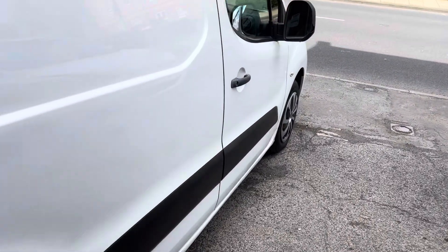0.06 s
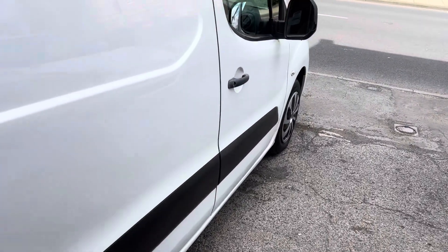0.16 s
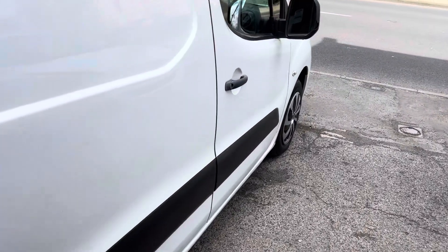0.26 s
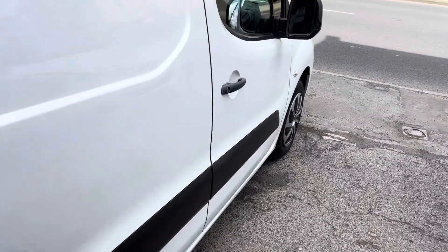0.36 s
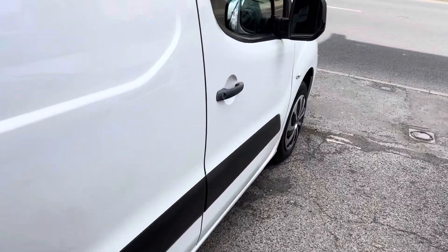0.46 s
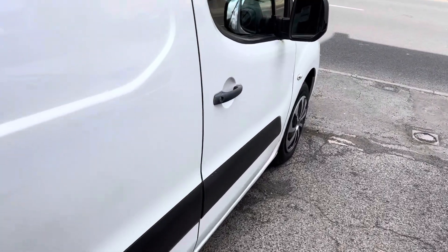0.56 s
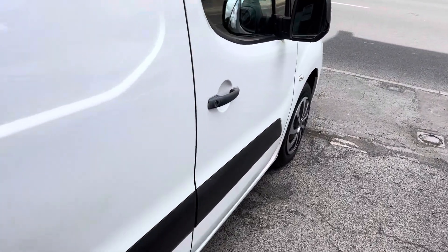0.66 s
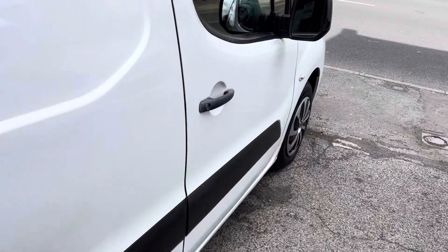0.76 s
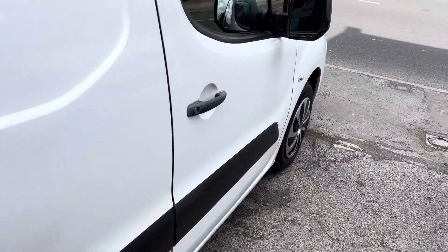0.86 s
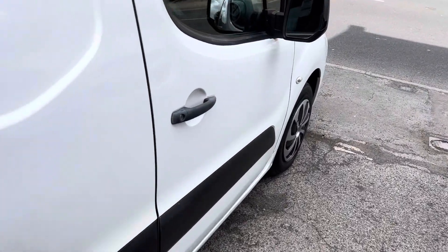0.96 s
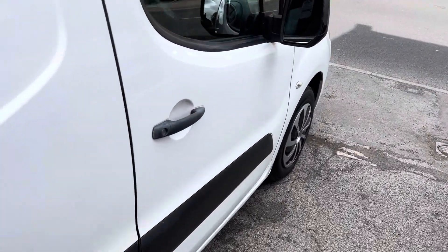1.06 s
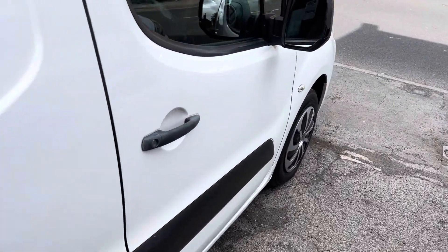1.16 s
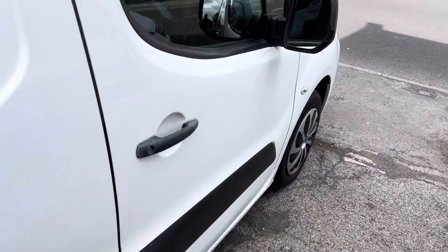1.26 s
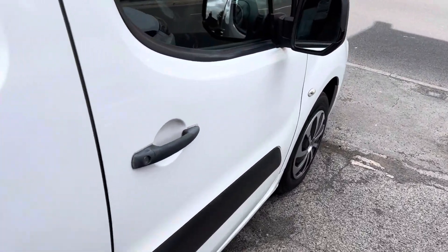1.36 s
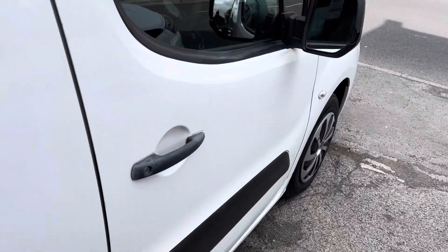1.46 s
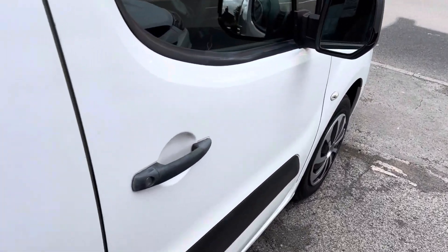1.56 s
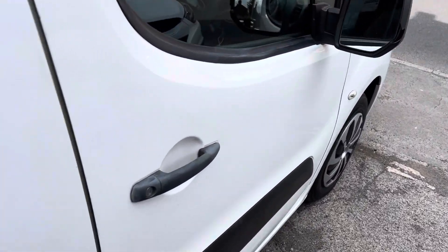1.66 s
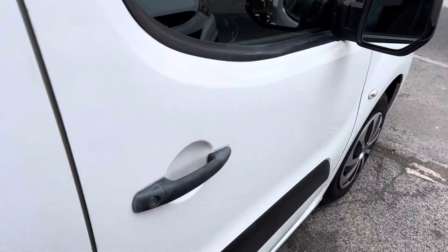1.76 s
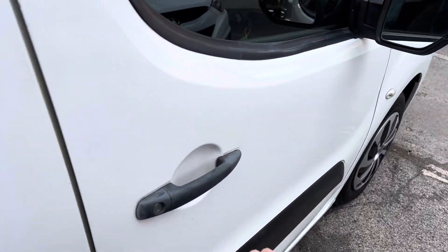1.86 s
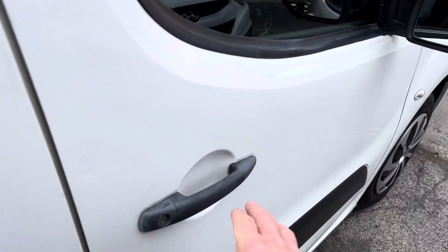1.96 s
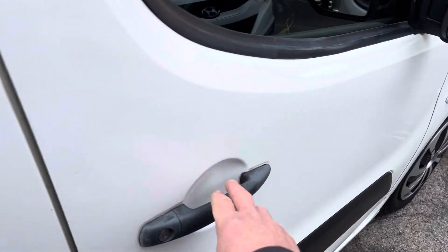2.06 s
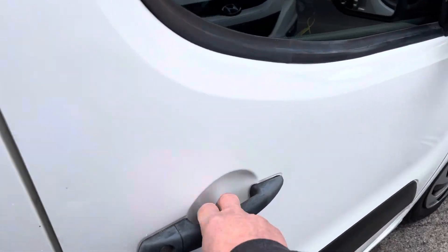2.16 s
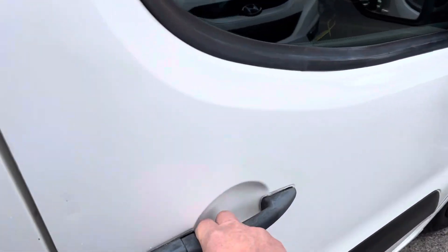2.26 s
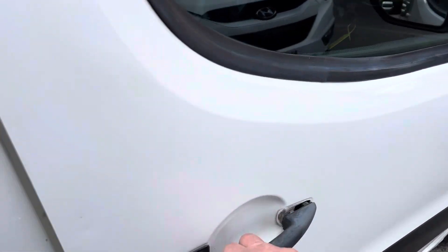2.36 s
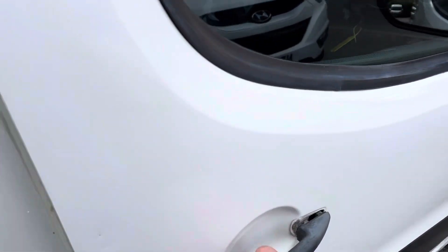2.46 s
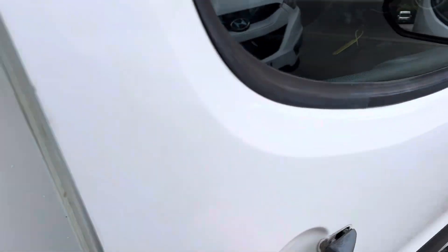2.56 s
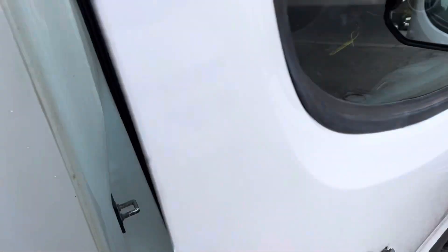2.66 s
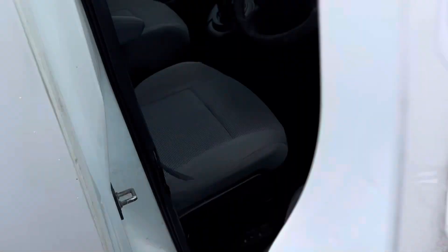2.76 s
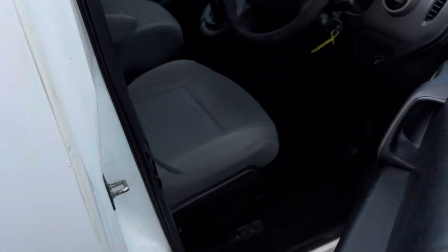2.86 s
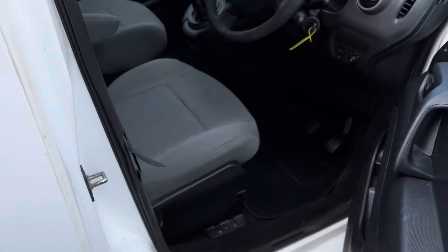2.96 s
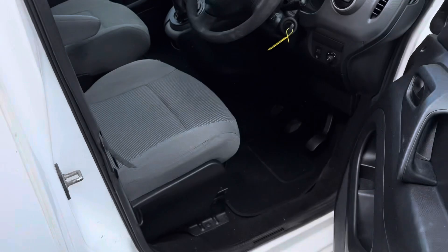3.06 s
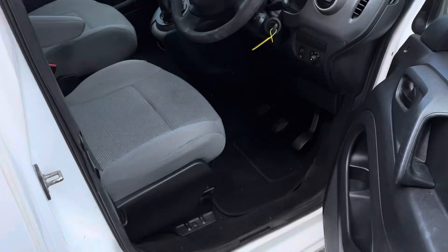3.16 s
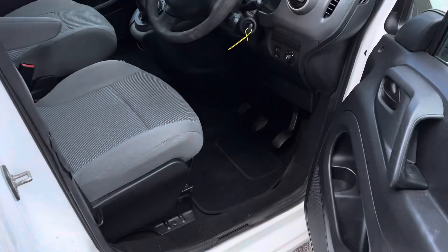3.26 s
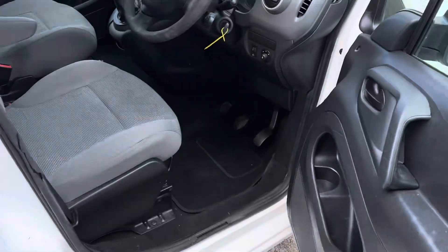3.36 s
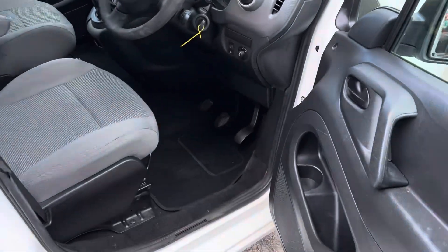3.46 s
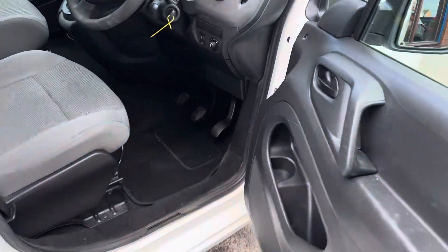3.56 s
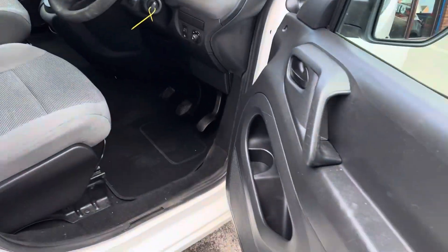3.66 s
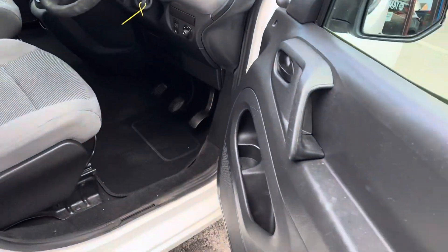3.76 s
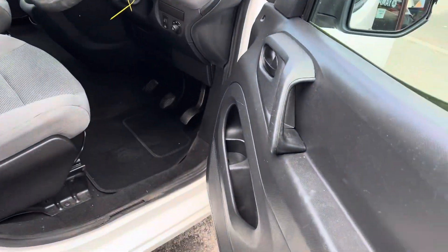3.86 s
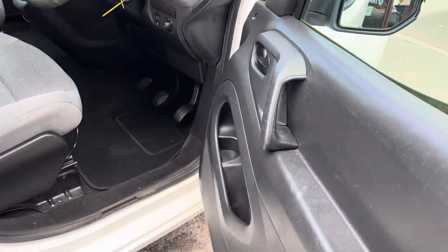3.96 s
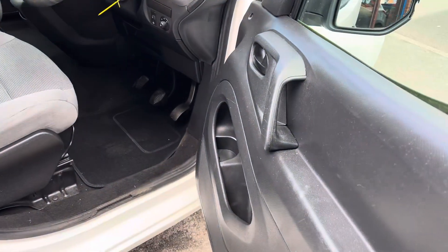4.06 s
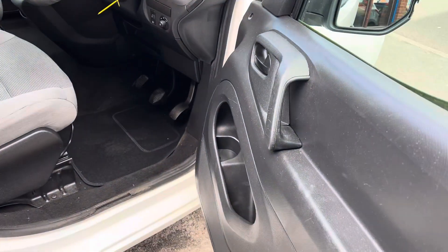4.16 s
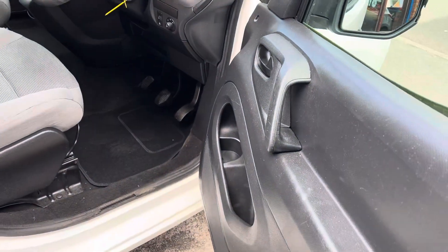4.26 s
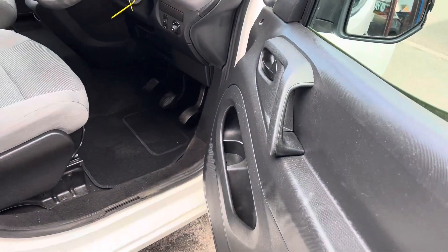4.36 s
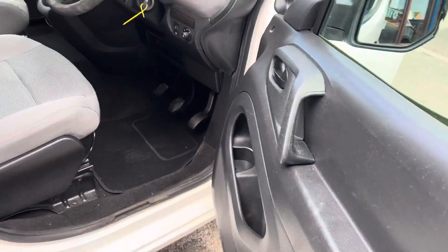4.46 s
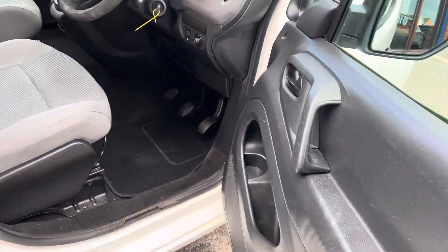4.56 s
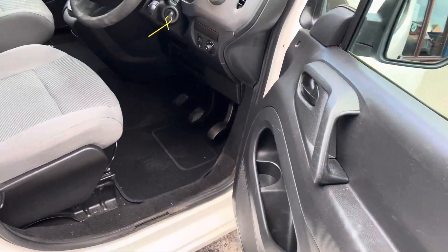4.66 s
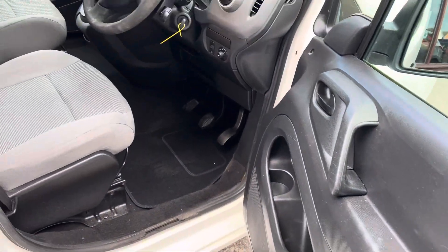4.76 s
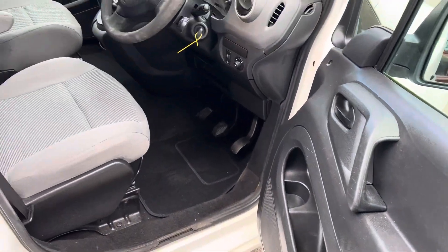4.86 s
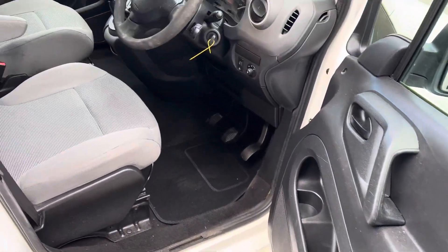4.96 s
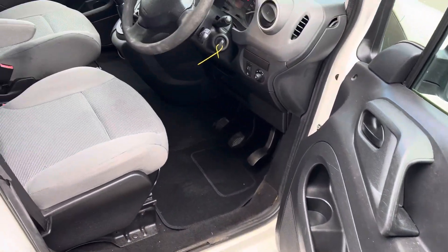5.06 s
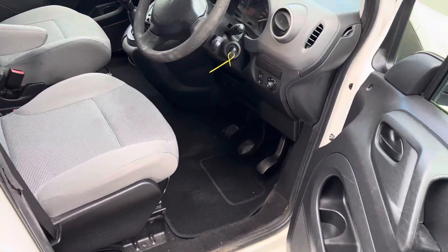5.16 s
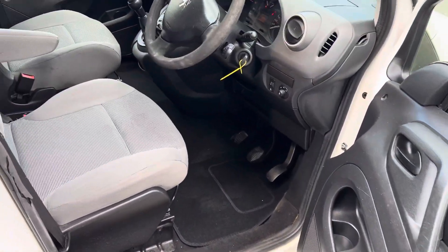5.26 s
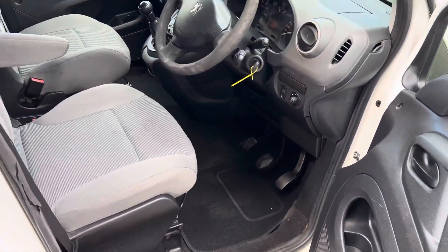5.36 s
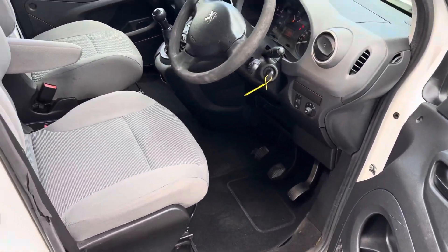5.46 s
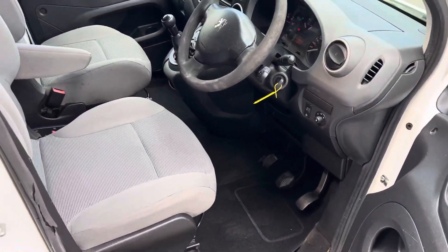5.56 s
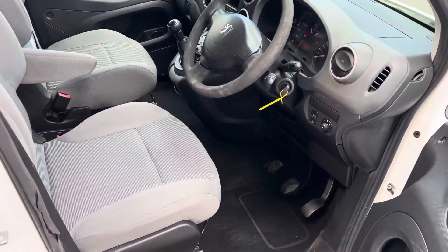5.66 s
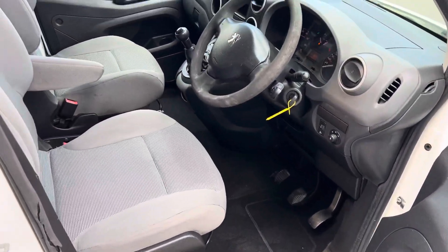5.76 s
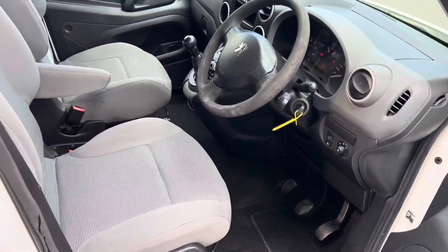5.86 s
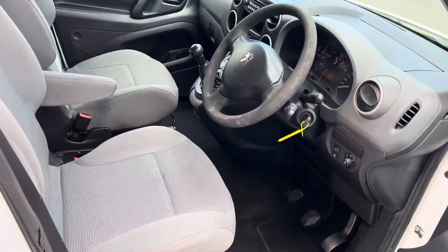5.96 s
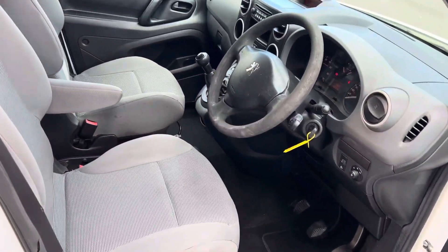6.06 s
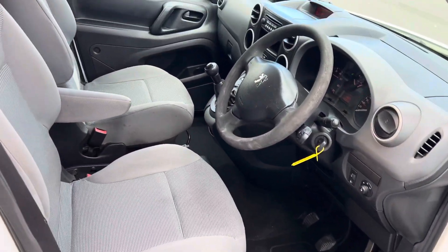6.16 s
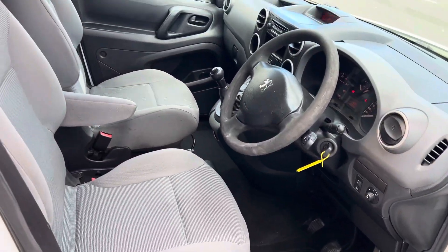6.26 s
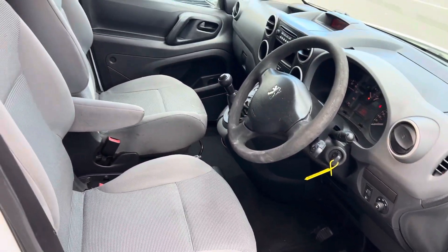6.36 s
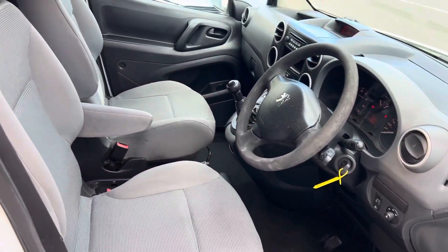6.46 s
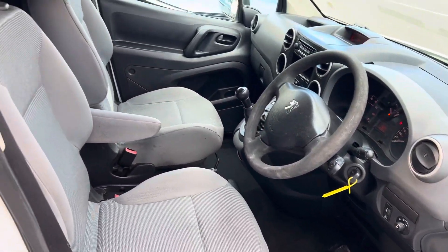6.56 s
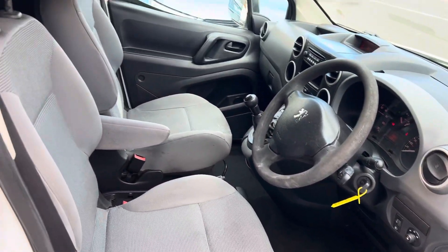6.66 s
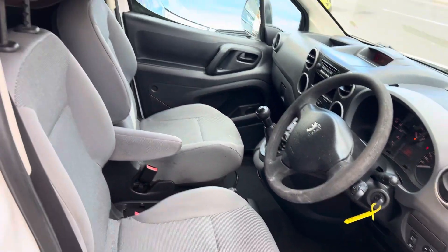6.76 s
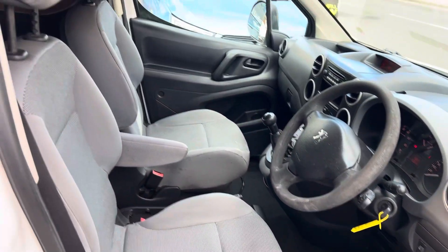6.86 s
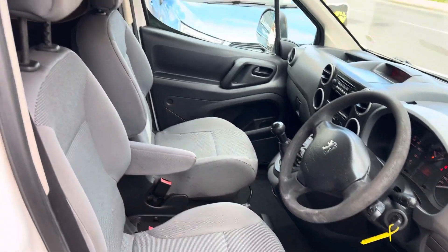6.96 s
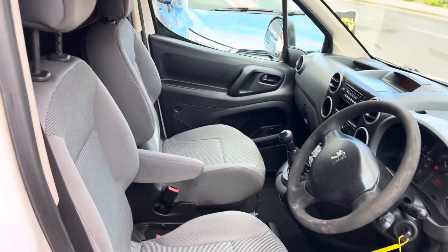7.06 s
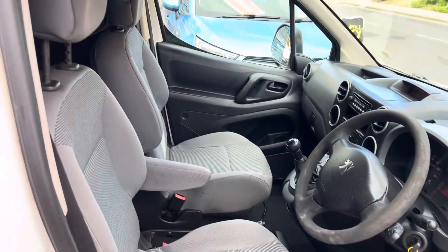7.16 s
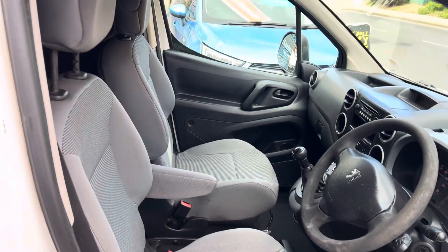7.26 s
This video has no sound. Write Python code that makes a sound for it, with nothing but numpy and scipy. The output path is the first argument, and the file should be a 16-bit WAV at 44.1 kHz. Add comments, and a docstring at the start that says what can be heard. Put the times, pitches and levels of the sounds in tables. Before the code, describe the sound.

A van idles on an outdoor lot with a low, throbbing rumble, a light engine rattle and faint hiss. Soft steps and small handling ticks come close to the hand-held microphone. The door handle clicks, the latch clacks, and the driver's door opens with a thump and a quick run of juddering knocks. A few soft bumps and rustles follow, and the engine's boom swells as the microphone leans into the cab.

```python
"""An outdoor lot, beside an idling van, on the stereo microphone of a hand-held camera walking up to it.
Four cylinders puff out an exhaust boom and rattle the block, over rumble, hiss and a narrow hum.
Close by, steps knock, cloth scrapes and the camera's grip ticks. At arm's length the handle and latch
clack and the driver's door thumps and judders over its check strap. The open door screens the engine
until the microphone passes it, and the boom swells as the camera leans into the cab."""
import sys
import numpy as np
from scipy import signal
from scipy.fft import rfft, irfft, next_fast_len
from scipy.io import wavfile
from scipy.ndimage import uniform_filter1d

SR = 44100
rng = np.random.default_rng(int(sys.argv[2]) if len(sys.argv) > 2 else 0)


def wrap_up_sound(samples):
    """Save the sound to the file named by the first command line argument, as 16-bit audio."""
    columns = np.atleast_2d(samples).T
    # keep every value between -1 and 1, then stretch to whole-number steps
    tamed = np.clip(columns, -1, 1)
    steps = np.round(tamed * 32767).astype(np.int16)
    wavfile.write(sys.argv[1], SR, steps)


N = 322371

# strength of the four firings in turn: (level [dB])
CYLINDERS_DB = [-0.45, 0.95, 0.3, -0.65]
# the engine along the microphone's path: (time [s], boom level [dB], rumble level [dB])
ENGINE_LEVELS = [(0, -34, -36), (.5, -44, -46), (1.1, -45, -39), (1.7, -40.5, -38.5), (2.1, -48.5, -42.5),
                 (2.85, -41, -41.5), (3.35, -42.5, -47.5), (3.9, -44.5, -42.5), (4.27, -40.5, -40.5),
                 (4.65, -71, -47), (4.95, -37, -49), (5.3, -46, -45.5), (5.8, -37, -43), (6.35, -29, -42),
                 (6.7, -33, -40), (7.31, -31.5, -37.5)]
# phase between the two microphone ports: (frequency [Hz], lead of the left [rad])
PORT_LEAD = [(0, 0), (1890, -0.3), (3190, 1.3), (4220, 0.4), (7490, 0.5), (8700, -0.0), (9730, -3.0),
             (10900, -3.6), (11500, -6.3), (12800, -6.3), (13300, -9.4), (14400, -9.5), (14900, -12.6),
             (16500, -12.6)]


def gain_of(db):
    """Decibels to a factor."""
    return 10 ** (np.asarray(db) / 20)


def unit_rms(x):
    """Scales to rms 1."""
    return x / np.sqrt(np.mean(x ** 2) + 1e-20)


def curve_at(points, hz):
    """Reads a spectrum table on a log-frequency axis."""
    f, value = np.transpose(points)
    return np.interp(np.log(hz + 1), np.log(f + 1), value)


def add(mix, s, sound, pan_db):
    """Mixes a sound in at time s, pan_db louder on the left than on the right."""
    part = mix[:, round(s * SR):][:, :len(sound)]
    part += sound[:part.shape[1]] * gain_of([[pan_db / 2], [-pan_db / 2]])


def ring(modes, t):
    """Sum of dying modes, peak 1."""
    x = sum(gain_of(db - 60 * t / t60) * np.sin(2 * np.pi * hz * t) for hz, db, t60 in modes)
    return x / abs(x).max()


def band(x, low_hz, high_hz):
    """Gentle band-pass."""
    sos = signal.butter(2, [low_hz, min(high_hz, SR / 2.2)], "band", fs=SR, output="sos")
    return signal.sosfilt(sos, x)


def resonate(x, hz, width_hz):
    """Two-pole resonance with gain near 1 at its centre."""
    return signal.lfilter(*signal.iirpeak(hz, hz / width_hz, SR), x)


def mic_position(t):
    """How far the door screens the microphone from the engine and how far it leans into the cab, 0-1."""
    swing_s, pass_s, lean_s = (2.4, 3.0), (4.6, 5.8), (5.0, 6.5)
    swung, passed, in_cab = (np.interp(t, span, [0, 1]) for span in (swing_s, pass_s, lean_s))
    return swung - passed, in_cab


def firing_count(firing_hz=26.4):
    """Running count of firings of four cylinders at a slightly uneven idle."""
    wobble = 0.01127 * unit_rms(uniform_filter1d(rng.standard_normal(N), 3000))
    return np.cumsum(firing_hz * (1 + wobble)) / SR


def throb(firings, depth, spread_db):
    """Level that jumps at each firing and dies away before the next."""
    strength = gain_of(np.resize(CYLINDERS_DB, 256) + spread_db * rng.standard_normal(256))
    return unit_rms(1 + depth * strength[firings.astype(int)] * np.exp(-(firings % 1) / 0.14))


def exhaust_boom(firings):
    """Eight multiples of the firing rate line up into puffs, each of a different strength."""
    t = np.arange(N) / SR
    times, boom_db, _ = np.transpose(ENGINE_LEVELS)
    screened, in_cab = mic_position(t)
    second_db = np.interp(t, times, boom_db)
    third_db = second_db - 15.5 + 10.5 * screened + 8 * in_cab
    harmonics_db = [second_db - 12, second_db] + [third_db + db for db in (0, -7, -16, -14, -19, -15)]
    firings_db = np.resize(CYLINDERS_DB, 256) + 1.6 * rng.standard_normal((256, len(harmonics_db))).T
    lag_rad, port_rad = -3.0, 0.23  # the lag keeps the puffs pointed after the bass roll-off
    phase = lag_rad + port_rad * np.c_[[1, -1]]
    puffs = 0
    for k, (db, each_db) in enumerate(zip(harmonics_db, firings_db), 1):
        level = gain_of(db + np.interp(firings, np.arange(256), each_db))
        puffs += level * np.cos(2 * np.pi * k * firings + phase)
    return np.sqrt(2) * puffs * gain_of([[.3], [-.3]])


def engine_spectrum(hz, t):
    """Strength of the engine's noise by frequency and time, on the way from the van's flank to its cab."""
    # tone beside the body and at the open door: (frequency [Hz], relative density [dB])
    flank = [(30, 2), (60, 6), (130, -16), (350, -13.5), (650, -15), (1300, -13.5), (2200, -20.5),
             (3300, -17.5), (4700, -21.5), (6300, -18), (7050, -23), (7800, -19), (10000, -22),
             (12000, -27), (16000, -39.5)]
    cab = [(30, -30), (70, -14), (110, -6), (220, -10), (340, -18), (500, -16), (900, -25), (1900, -29),
           (2350, -35), (5000, -39), (6500, -32), (8500, -36), (11000, -45), (16000, -58)]
    times, _, path_db = np.transpose(ENGINE_LEVELS)
    screened, in_cab = mic_position(t)
    rumble_db = np.interp(t, times, path_db)
    middle_db = -26 + 0.47 * rumble_db - 1.5 * screened + 1.5 * in_cab
    hiss_db = -41.5 - 0.5573 * t  # sinks as the microphone closes in on the van
    cab_share = np.interp(in_cab, [0, 1], [0.27, 0.83])
    colour = gain_of(np.outer(curve_at(flank, hz), 1 - cab_share) + np.outer(curve_at(cab, hz), cab_share))
    for low, high, db in ((0, 300, rumble_db), (300, 1200, middle_db), (1200, SR, hiss_db)):
        inside = (hz >= low) & (hz < high)
        colour[inside] *= gain_of(db) / np.sqrt((colour[inside & (hz > 70)] ** 2).sum(0))
    return colour


def engine_wash(firings):
    """Patchy rumble and hiss that throb a little with each firing."""
    # likeness of the two ports: (frequency [Hz], correlation [0-1])
    port_likeness = [(60, .7), (200, .6), (400, .7), (1100, .45), (1800, .5), (3000, .8), (6000, .82),
                     (8500, .92), (16000, .9)]
    # balance of the two ports: (frequency [Hz], left minus right [dB])
    port_balance = [(60, .5), (300, .2), (1000, 1), (3000, 2), (5500, 2), (8000, 0), (16000, 0)]
    frames, hz = N // 256 + 5, np.fft.rfftfreq(1024, 1 / SR)
    left_re, left_im, apart_re, apart_im, patches = rng.standard_normal((frames, 513, 5)).T
    patches_db = 2.03 * unit_rms(uniform_filter1d(uniform_filter1d(patches, 8, 0), 6, 1))
    colour = engine_spectrum(hz, np.arange(frames) * 256 / SR)
    hz = hz[:, None]
    likeness, tilt = curve_at(port_likeness, hz), gain_of(curve_at(port_balance, hz) / 2)
    left = left_re + 1j * left_im
    right = likeness * left + np.sqrt(1 - likeness ** 2) * (apart_re + 1j * apart_im)
    right *= np.exp(-1j * curve_at(PORT_LEAD, hz))
    spectra = np.array([left * tilt, right / tilt]) * colour * gain_of(patches_db)
    low, high = (signal.istft(spectra * part, nperseg=1024, noverlap=768)[1][:, :N]
                 for part in (hz <= 900, hz > 900))
    low *= throb(firings, depth=0.35, spread_db=.4)
    high *= throb(firings, depth=0.26, spread_db=6.0)
    return gain_of(2.0) * (low + high)


def block_clatter(firings):
    """Combustion rattle rings in the engine block; each resonance comes and goes."""
    # block resonances: (frequency [Hz], width [Hz], level [dB])
    block_modes = [(2657, 47, -4), (2845, 46, 4.5), (3048, 34, 6.5), (3443, 32, 6), (3625, 46, 4),
                   (1314, 82, -2.5), (1849, 55, 7.5), (4340, 76, 0.5), (6250, 86, 0)]
    patch_s, patch_db = .07, 3.5
    t = np.arange(N) / SR
    noise = rng.standard_normal((2, N))
    shake = (noise[0] + .5 * noise) * throb(firings, depth=4.0, spread_db=2.0)
    patches_db = patch_db * rng.standard_normal((128, len(block_modes))).T
    rung = 0
    for (hz, width_hz, db), patches in zip(block_modes, patches_db):
        drift_db = np.interp(t / patch_s, np.arange(128), patches)
        rung += gain_of(db + drift_db) * unit_rms(resonate(shake, hz, width_hz))
    screened, in_cab = mic_position(t)
    return gain_of(-50 - 5.5 * screened - 4 * in_cab) * unit_rms(rung) * gain_of([[.8], [-.8]])


def hum(hz=501, width_hz=14):
    """Noise in one steep, narrow resonance, almost lost behind the open door."""
    tone = resonate(resonate(rng.standard_normal(N), hz, width_hz), hz, 2 * width_hz)
    screened, _ = mic_position(np.arange(N) / SR)
    return gain_of(-54.5 - 24 * screened) * unit_rms(tone)


def rub(length_s, slips_per_s=1500, bright_share=0.12):
    """Uneven slips, each a dull click into the rubbed body."""
    size = round(length_s * SR)
    slips = rng.standard_normal(size + 600) * (rng.random(size + 600) < slips_per_s / SR)
    slips *= np.pad(signal.windows.tukey(size, .5), (0, 600))
    dull = unit_rms(band(band(slips, 77, 399), 68, 1700))
    bright = unit_rms(band(band(slips, 210, 620), 180, 1600))
    return (1 - bright_share) * dull + bright_share * bright


def knock(hz, t60, rise_cycles=0.047):
    """A damped push with a shorter overtone; its pitch sags as the panel settles."""
    t = np.arange(SR // 3) / SR
    phase = 2 * np.pi * hz * (t + 0.0014 * (1 - np.exp(-t / 0.005)))
    body = np.sin(phase) + 0.6 * np.sin(1.89 * phase) * gain_of(-150 * t / t60)
    push = -body * gain_of(-60 * t / t60) * (1 - np.exp(-t * hz / rise_cycles)) ** 2
    soft_contact = signal.butter(4, 3.2 * hz, fs=SR, output="sos")
    return signal.sosfilt(soft_contact, push)


def scrape(length_s, hz=1830):
    """Cloth or a sole slides with a short hiss in one resonance."""
    size = round(length_s * SR)
    hiss = unit_rms(band(rng.standard_normal(size), 0.75 * hz, 1.06 * hz))
    return hiss * signal.windows.tukey(size, .5)


def grip_tick(rise_s=0.00025):
    """The camera's grip rings under a soft contact, right by the microphone."""
    # modes of the grip: (frequency [Hz], level [dB], t60 [s])
    grip_modes = [(692, 18, 0.019), (950, 10.5, 0.026), (1270, 21, 0.0067), (1590, 5.5, 0.024),
                  (2180, 4, 0.02), (2700, 5, 0.015), (3100, -2, .012), (5440, -2, .004)]
    t = np.arange(3000) / SR
    shifts = rng.uniform(-1.2, 1, (len(grip_modes), 2))  # each tick lands on another spot
    modes = [(hz * (1 + 0.031 * detune), db + 4 * boost, t60)
             for (hz, db, t60), (detune, boost) in zip(grip_modes, shifts)]
    return ring(modes, t) * (1 - np.exp(-t / rise_s))


def latch_clack(bright_hz, rise_s=0.00021):
    """Metal meets metal: a burst of rattle with a fine treble edge, plus the ring of the latch parts."""
    # latch, rung by dull clacks: (frequency [Hz], level [dB], t60 [s])
    latch_modes = [(343, -5, 0.15), (526, -13, 0.08), (738, -1, 0.048), (1017, 5, 0.039), (1363, 3, 0.085),
                   (3550, -14, 0.043)]
    # bolt and striker, rung by bright clacks: (frequency [Hz], level [dB], t60 [s])
    striker_modes = [(1220, 11, 0.011), (2340, -4, 0.049), (2626, -2, 0.059), (2990, -4, 0.088),
                     (3360, 0, .06), (3550, -5, .06), (7950, 13, 0.017), (15500, 8, .025)]
    t = np.arange(SR // 6) / SR
    rattle_t60 = 0.21 * (1000 / bright_hz) ** 0.62  # brighter clacks die sooner
    noise = rng.standard_normal(len(t))
    body = band(noise, 0.3 * bright_hz, bright_hz) * gain_of(-60 * t / rattle_t60)
    edge = band(noise, 3000, 21000) * gain_of(-18 - 60 * t / 0.034)
    rattle = body / (3 * np.std(body[:200])) + edge
    if bright_hz < 1900:
        ring_share = 0.75
        modes = [(hz, db, min(t60, rattle_t60)) for hz, db, t60 in latch_modes]
    else:
        ring_share, db_per_octave = 0.57, -21
        modes = [(hz, db + db_per_octave * max(np.log2(hz / bright_hz), 0), t60)
                 for hz, db, t60 in striker_modes]
    return ((1 - ring_share) * rattle + ring_share * ring(modes, t)) * (1 - np.exp(-t / rise_s))


def ports_and_echoes(near, echo_t60=0.0072):
    """Close sounds reach the two ports out of phase, with short echoes off the van's side."""
    size = next_fast_len(N)
    width_rad = .5  # a constant phase offset gives close sounds a little stereo width
    lead = width_rad + curve_at(PORT_LEAD, np.fft.rfftfreq(size, 1 / SR))
    right = irfft(rfft(near[1], size) * np.exp(-1j * lead), size)[:N]
    t = np.arange(600) / SR
    taps = rng.choice([-1., 1.], 600) * (rng.random(600) < .1) * gain_of(-60 * t / echo_t60)
    echoes = band(signal.oaconvolve(near.mean(0), taps / np.linalg.norm(taps))[:N], 510, 4000)
    return np.array([near[0], right]) + gain_of(-3) * np.array([echoes, -echoes])


def scene():
    """Grip, steps and door close to the microphone, the idling engine behind them."""
    # the camera's grip: (time [s], level [dB])
    ticks = [(0.533, -14.5), (0.861, -14.5), (1.015, -21), (1.297, -13), (1.401, -17), (1.819, -16.5),
             (2.245, -14.5), (2.512, -11.5), (4.146, -23), (4.196, -11.5)]
    # handle and latch: (time [s], level [dB], left minus right [dB], brightness [Hz])
    clacks = [(1.888, -19.5, 3, 2930), (1.905, -21.5, -2, 2300), (2.317, -11.5, 3, 1230),
              (2.321, -9.5, 2, 1390), (2.395, -19, 3, 1450), (2.8912, -9, -2, 12100),
              (2.891, -4.5, 0, 4240), (2.896, -16, 7, 2700), (2.902, -7, 0, 2300), (3.005, -17.5, 2, 4100)]
    # steps, hands and door panel: (time [s], level [dB], pitch [Hz], t60 [cycles])
    knocks = [(.010, -19, 128, 15), (0.229, -30, 121, 20), (0.258, -24.5, 65.4, 22),
              (0.748, -20.5, 104, 18), (0.789, -19.5, 72.5, 9.5), (1.191, -24.5, 86, 17),
              (1.498, -18.5, 94.5, 6), (1.883, -28, 416, 17), (1.8855, -9.5, 1510, 6),
              (2.3196, -9.5, 300, 5), (2.3236, -8, 105, 6.5), (2.341, -17.5, 60.6, 16),
              (2.515, -22, 120, 16), (2.863, -21, 480, 10), (2.868, -13, 394, 5.5), (2.875, -5.5, 89, 2.5),
              (2.895, -18.5, 353, 26), (2.9023, -18.5, 499, 49), (2.940, -23, 330, 10),
              (2.978, -29, 330, 3), (3.024, -19, 420, 6), (3.032, -7.5, 62.5, 6), (3.0385, -18, 222, 5.5),
              (3.086, -23, 400, 8), (3.103, -12.5, 480, 4), (3.106, -9, 160, 1.5), (3.111, -23, 480, 10),
              (3.119, -12, 410, 6), (3.139, -6, 590, 8.5), (3.1393, -14, 1380, 4.5), (3.143, -11, 280, 6),
              (3.149, -5.5, 615, 2), (3.158, -12, 406, 5), (3.167, -10, 680, 3), (3.178, -10, 85, 3.5),
              (3.198, -21, 66, 7), (3.353, -25, 1510, 20), (4.015, -16.5, 537, 4), (4.028, -27, 106, 14),
              (4.081, -25.5, 192, 12), (4.605, -25, 107, 8), (5.815, -23.5, 580, 12), (5.819, -13, 210, 3),
              (7.294, -21.5, 261, 15)]
    # rubbing and juddering strokes: (time [s], length [s], level [dB])
    rubs = [(0, 0.051, -24.5), (0.232, 0.022, -37), (0.288, 0.043, -33.5), (0.74, 0.095, -36),
            (2.3, 0.018, -31), (2.326, 0.056, -32), (2.903, 0.17, -33), (3.032, 0.036, -38),
            (3.075, 0.057, -27.5), (3.109, 0.075, -22), (3.969, 0.091, -35.5), (4.049, 0.046, -35),
            (4.178, 0.093, -39.5), (4.567, 0.096, -45.5)]
    # cloth or sole: (time [s], length [s], level [dB])
    scrapes = [(0.099, 0.19, -46), (4.209, 0.061, -45), (4.461, 0.11, -44)]
    firings, near = firing_count(), np.zeros((2, N))
    for s, db in ticks:
        add(near, s, gain_of(db) * grip_tick(), pan_db=3)
    for s, db, pan_db, bright_hz in clacks:
        add(near, s, gain_of(db) * latch_clack(bright_hz), pan_db)
    for s, db, hz, cycles in knocks:
        add(near, s, gain_of(db) * knock(hz, t60=cycles / hz), pan_db=.4)
    for s, length_s, db in rubs:
        add(near, s, gain_of(db) * rub(length_s), pan_db=.4)
    for s, length_s, db in scrapes:
        add(near, s, gain_of(db) * scrape(length_s), pan_db=1.5)
    engine = exhaust_boom(firings) + engine_wash(firings) + block_clatter(firings)
    return engine + hum() + ports_and_echoes(near)


def record(dry, bass_hz=34, top_hz=16300):
    """The microphone's bass roll-off, then the band limit."""
    trimmed = signal.sosfilt(signal.butter(3, bass_hz, "high", fs=SR, output="sos"), dry)
    band_limit = signal.firwin(511, top_hz, window=("kaiser", 9), fs=SR)
    return signal.oaconvolve(trimmed, band_limit[None], "same")


dry = scene()
out = record(dry)
wrap_up_sound(out)
```